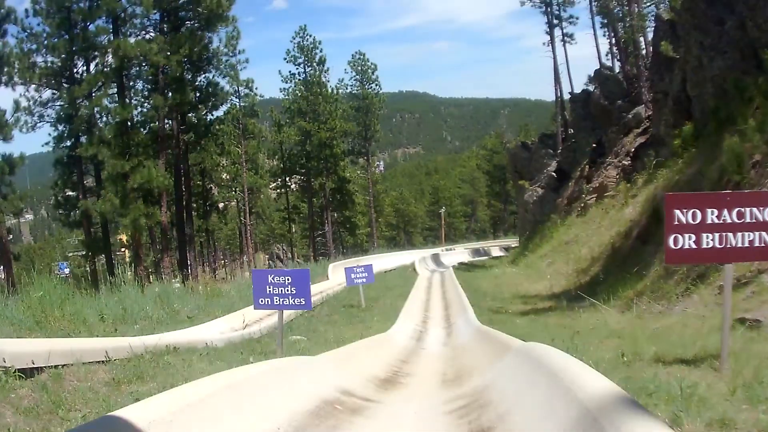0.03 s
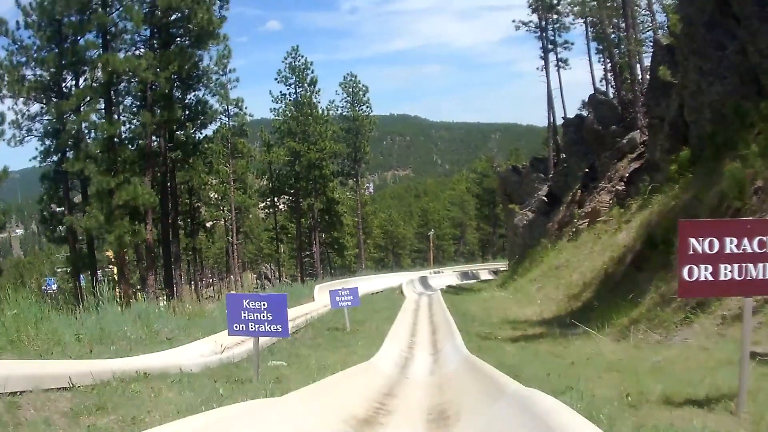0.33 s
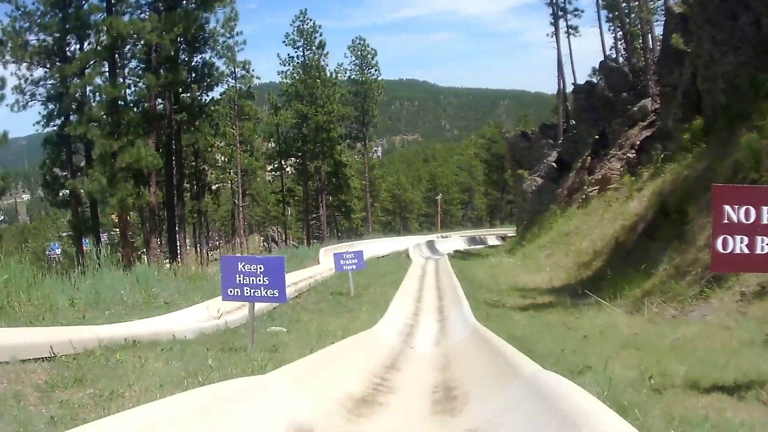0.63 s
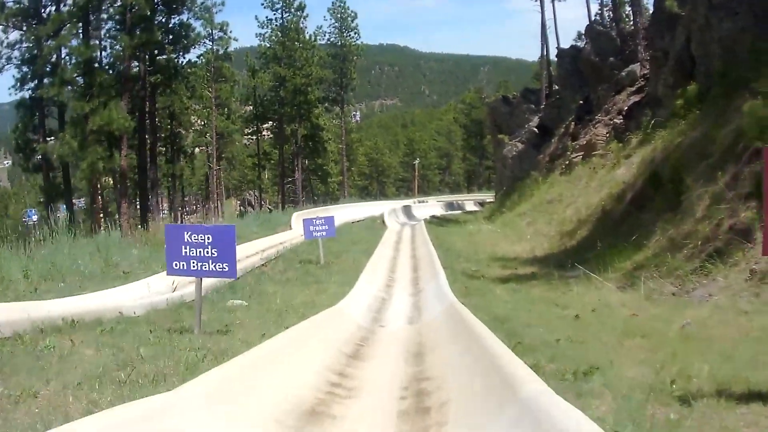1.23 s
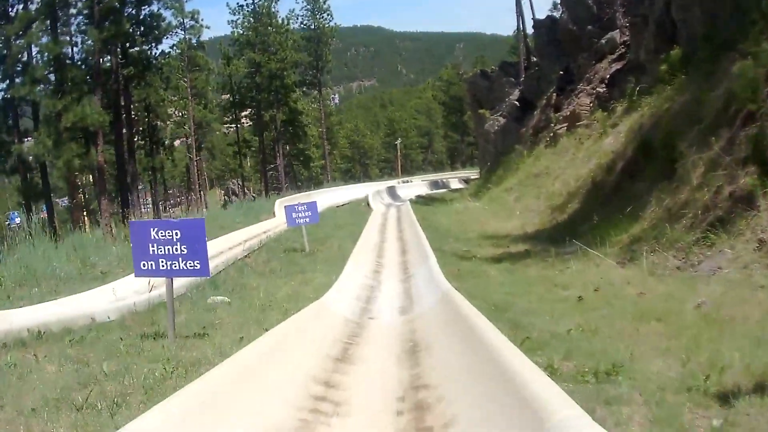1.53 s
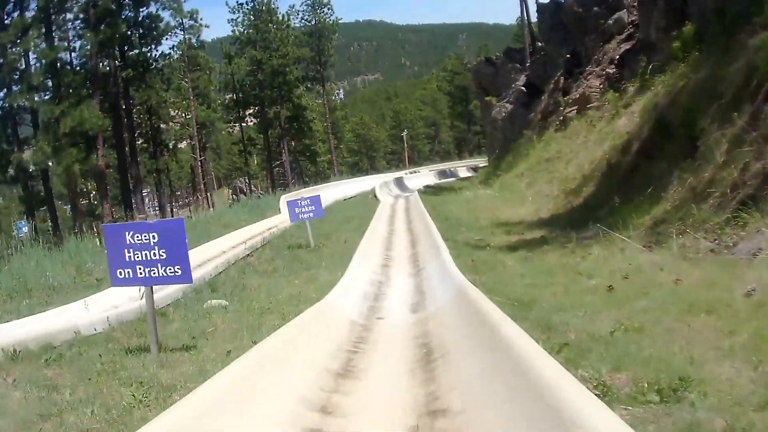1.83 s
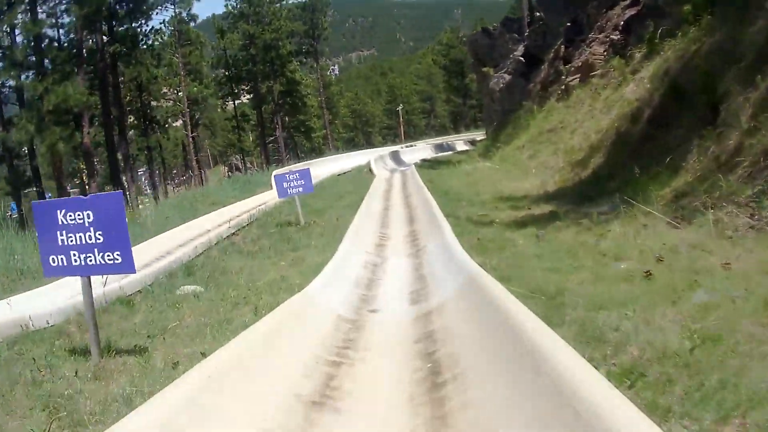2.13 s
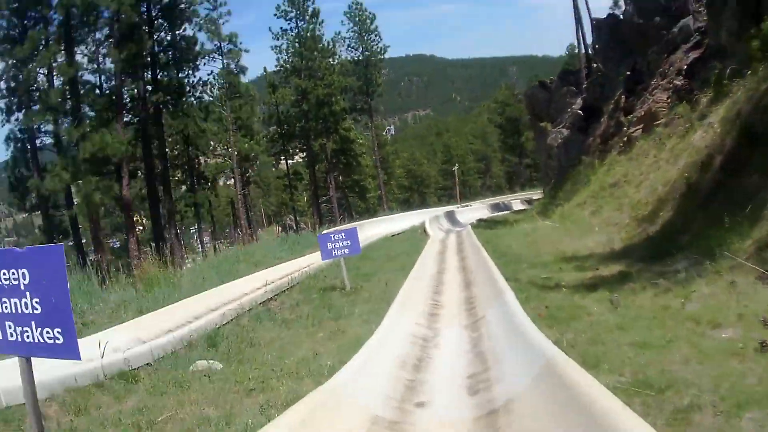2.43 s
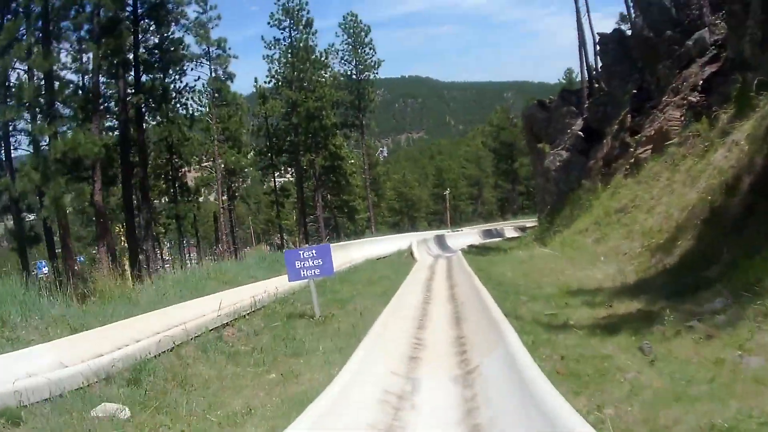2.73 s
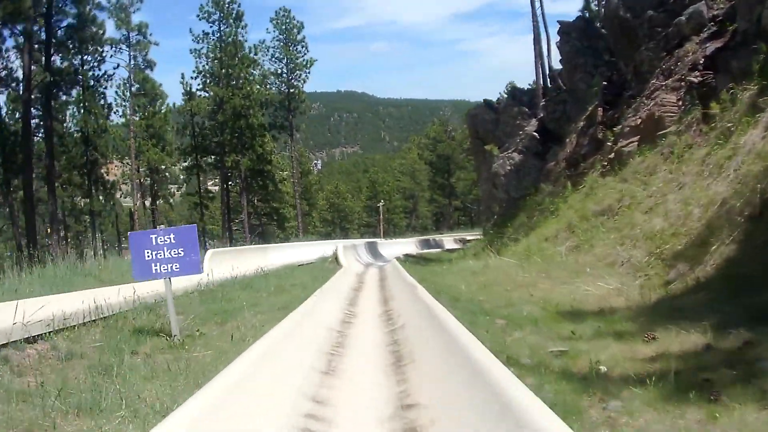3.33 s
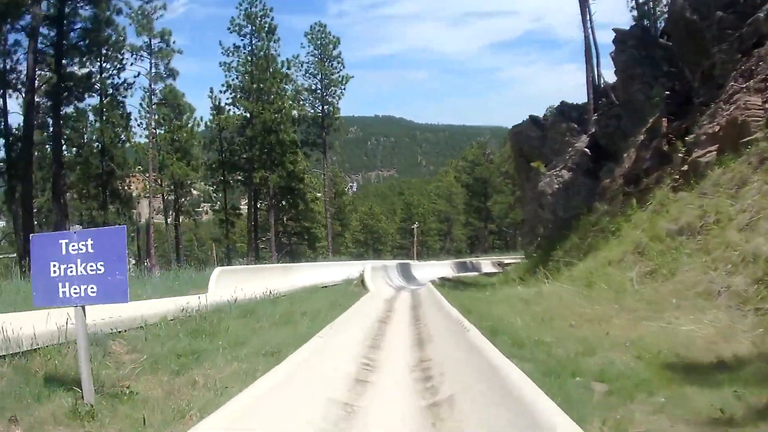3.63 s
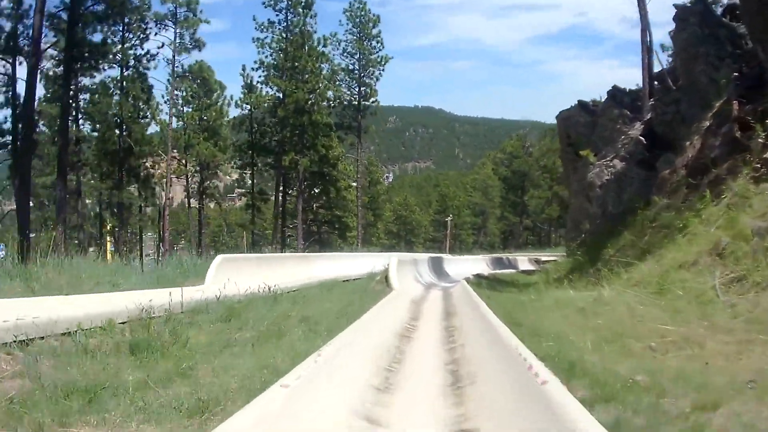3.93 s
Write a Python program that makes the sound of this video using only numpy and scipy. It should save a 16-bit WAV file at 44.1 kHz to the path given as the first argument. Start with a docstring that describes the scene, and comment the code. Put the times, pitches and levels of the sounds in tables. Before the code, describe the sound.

A wheeled sled rolls down a slide track, heard from the seat, starting with a quiet rumble, grainy hiss and light knocks. A brief scrape comes at about 1.4 seconds, then a hollow, wavering drone. Near 2.3 seconds wind puffs on the microphone and a cluster of bumps hits. The rumble swells with speed until 4 seconds, with the hardest, slightly distorted knocks around 3.2 and from 3.7 seconds.

```python
"""A wheeled sled gathers speed down a trough-shaped slide, heard from the rider's seat.
The wheels rumble through the plastic shell and drone in the trough; bumps in the track knock the sled.
The runners hiss, squeak once and scrape. Wind puffs on the microphone,
and the hardest knocks overload the camera."""
import sys
import numpy as np
from scipy import signal
from scipy.fft import rfft, irfft, next_fast_len
from scipy.io import wavfile
from scipy.ndimage import uniform_filter1d, map_coordinates

SR = 44100
rng = np.random.default_rng(int(sys.argv[2]) if len(sys.argv) > 2 else 0)


def pcm_store(signal):
    """Save signal as 16-bit PCM."""
    levels = np.round(np.clip(np.atleast_2d(signal), -1, 1) * 32767)
    wavfile.write(sys.argv[1], SR, levels.astype(np.int16).T)


N = 176400


def amp(db):
    """Decibels to gain."""
    return 10 ** (np.asarray(db) / 20)


def unit(x):
    """Scaled to rms 1."""
    return x / np.sqrt(np.mean(x ** 2) + 1e-20)


def curve(rows):
    """An automation lane: one value per sample from (time_s, value) rows."""
    return np.interp(np.arange(N) / SR, *np.transpose(rows))


def wobble(rate_hz):
    """A smooth random modulator, rate_hz knots a second."""
    knots = rng.standard_normal(int(N * rate_hz / SR) + 4)
    return map_coordinates(knots, [np.arange(N) * rate_hz / SR])


def colour(points, hz):
    """EQ gain through (freq_hz, gain_db) points on a log axis."""
    freq_hz, gain_db = np.transpose(points)
    return amp(np.interp(np.log(hz + 1), np.log(freq_hz + 1), gain_db))


def resonant(modes, hz, order=1):
    """Gain of a bank of resonances; a higher order has steeper skirts."""
    return np.sqrt(sum(amp(db) ** 2 / (1 + (2 * (hz - centre) / width) ** 2) ** order
                       for centre, width, db in modes))


def filtered(x, gain):
    """x through a minimum-phase filter whose gain is a function of frequency."""
    size = 2 * next_fast_len(len(x))
    hz = np.fft.rfftfreq(size, 1 / SR)
    cepstrum = irfft(np.log(np.maximum(gain(hz), 1e-6)))
    cepstrum[1:size // 2] *= 2
    cepstrum[size // 2 + 1:] = 0
    return irfft(rfft(x, size) * np.exp(rfft(cepstrum)))[:len(x)]


def noise(points):
    """Coloured noise of rms 1."""
    return unit(filtered(rng.standard_normal(N), lambda hz: colour(points, hz)))


def patchy(x, depth_db):
    """x with brief random patches of gain, each a few hundred hertz wide, at rms 1."""
    spectra = signal.stft(x, nperseg=1024)[2]
    patches = uniform_filter1d(rng.standard_normal(spectra.shape), size=7, axis=0)
    patches = unit(uniform_filter1d(patches, size=6, axis=1))
    return unit(signal.istft(spectra * amp(depth_db * patches), nperseg=1024)[1][:N])


# Sub-bass of the wind: freq_hz, gain_db
WIND_EQ = [(8, 4.5), (20, 6.5), (45, -4.5), (75, -11), (150, -45)]
# Wind fader: time_s, level_db
WIND_LEVEL = [(0, -41.5), (1.2, -47.5), (2.2, -44.5), (2.29, -28.5), (2.42, -35.5), (4, -62.5)]

def wind():
    """Low, lumpy puffs of air on the microphone."""
    puffs = noise(WIND_EQ) * amp(2.3 * np.tanh(wobble(18)))
    return unit(puffs) * amp(curve(WIND_LEVEL))


# Tone of the runners' hiss: freq_hz, gain_db
HISS_EQ = [(300, -14.5), (1500, 8.5), (2500, -1.5), (3200, -0.5), (4400, -2), (5600, -1), (7000, -3.5),
           (9300, -4.5)]
# Hiss fader: time_s, level_db
HISS_LEVEL = [(0, -47), (.27, -46), (.44, -40), (1.03, -40), (1.28, -42), (1.42, -38), (1.76, -43),
              (2, -37), (2.24, -39), (2.67, -37), (2.83, -33), (3.11, -35.5), (3.32, -30.5), (3.61, -28),
              (3.93, -34)]

def runners():
    """The runners slide with a grainy hiss whose colour keeps shifting."""
    hiss = patchy(noise(HISS_EQ), depth_db=2.5)
    grain = amp(0.37 * wobble(40) + 1.07 * wobble(350))
    return unit(hiss * grain) * amp(curve(HISS_LEVEL))


def squeak(peak_s=1.161, pitch_hz=1405, fade_s=0.008):
    """A runner gives one tiny, rough-edged squeak."""
    t = np.arange(N) / SR
    envelope = 2 * amp(-34) * np.exp(-np.abs(t - peak_s) / fade_s)
    return envelope * np.sin(2 * np.pi * pitch_hz * t + 0.9 * wobble(220))


# Tone of the dragging runner: freq_hz, gain_db
SCRAPE_EQ = [(200, -26), (650, -24), (950, -0.5), (1450, -15), (1900, -3), (2600, -2.5), (3200, -19.5),
             (5500, -11), (9000, -34)]
# Its ringing resonances: pitch_hz, width_hz, gain_db
SCRAPE_MODES = [(1003, 93, -4), (1260, 80, -4.5), (1454, 98, -0.5), (2320, 210, -19)]

def scrape(start_s=1.424, hold_s=0.092, release_t60_s=0.39, level_db=-34, ring_db=10):
    """A runner catches the trough and rings as it drags."""
    since = np.arange(N) / SR - start_s
    stroke = (since > 0) * amp(level_db - 60 * np.maximum(since - hold_s, 0) / release_t60_s)
    slips = rng.standard_normal(N) * amp(0.82 * wobble(200))
    tone = lambda hz: colour(SCRAPE_EQ, hz) + amp(ring_db) * resonant(SCRAPE_MODES, hz, order=2)
    return stroke * unit(filtered(slips, tone))


# Hollow resonances of the wheels in the trough: pitch_hz, width_hz, gain_db
DRONE_MODES = [(608.4, 61, 6), (647, 82, -2), (751, 85, -2)]
# Drone fader, highest midway: time_s, level_db
DRONE_LEVEL = [(0, -49), (1.5, -51), (1.65, -41.5), (1.95, -38.5), (2.11, -45), (2.19, -33.5),
               (2.55, -34.5), (4, -55)]

def drone(waver_hz=12):
    """The wheels sound a hollow, surging and wavering note in the trough."""
    ring = filtered(rng.standard_normal(N), lambda hz: resonant(DRONE_MODES, hz, order=2))
    drift_cycles = np.cumsum(waver_hz * wobble(12)) / SR
    wavering = np.real(signal.hilbert(ring) * np.exp(2j * np.pi * drift_cycles))  # frequency shifter
    surging = wavering * amp(3.1 * wobble(29.96))
    return patchy(surging, depth_db=2.0) * amp(curve(DRONE_LEVEL))


# Bright resonances of the wheel frame: pitch_hz, width_hz, gain_db
FRAME_MODES = [(1750, 140, 13), (3750, 600, 9), (4520, 84, 9), (5330, 840, 8)]

def frame(hz):
    """Gain of the wheel frame, which rings in hard contacts."""
    return np.hypot(resonant(FRAME_MODES, hz), 1)


# Body resonances of the plastic shell: pitch_hz, width_hz, gain_db
SHELL_MODES = [(273.5, 12.6, 7), (370, 33, -4), (450, 103, -4), (669, 106, 1), (774, 38, 3), (825, 61, 2.5),
               (975, 78, -2), (1089, 107, 2), (1253, 180, -0.5), (1443, 60, 0.5), (1700, 210, -11),
               (2280, 240, -3)]

def shell(hz, direct_db=-7):
    """Gain of the sled's shell: its resonances plus what passes between them."""
    return np.hypot(resonant(SHELL_MODES, hz), amp(direct_db))


def burst(t, gain, t60_s, attack_s=0.00066, tail_db=-30, tail_t60_s=0.41):
    """An impact and its quickly dying clatter through a filter, starting near rms 1."""
    decay = amp(-60 * t / t60_s) + amp(tail_db - 60 * t / tail_t60_s)
    envelope = decay * (1 - np.exp(-t / attack_s))
    clatter = envelope * rng.standard_normal(len(t))
    click = 0.058 * np.linalg.norm(envelope) * (t == 0)
    return unit(filtered(clatter + click, gain)) * np.sqrt(np.mean(envelope ** 2))


# Midrange knock of the shell: freq_hz, gain_db
KNOCK_EQ = [(60, -5), (250, -12), (600, 1), (1000, 0), (1500, 0.5), (2200, -10), (3200, -24), (5000, -22.5),
            (9000, -34)]
# Top-end crack of the wheel frame: freq_hz, gain_db
CRACK_EQ = [(300, -41), (1200, -20), (2000, 7.5), (3700, -8), (5500, -6.5), (9500, 1.5)]
# Low thud of the chassis: freq_hz, gain_db
THUD_EQ = [(30, -11), (115, 0.5), (170, -4), (260, 0), (370, -0.5), (800, -28)]
# Bumps in the track, crack and thud relative to the knock: start_s, level_db, crack_db, thud_db, ring_hz
BUMP_HITS = [(.053, -31.5, -22, -11.5, 1110), (0.084, -35, -20, -8, 1500), (0.224, -36, -27, 4.5, 400),
             (.258, -31, -9, -7, 450), (0.4627, -18, -3, -11, 1830), (.783, -32.5, -19, -6, 790),
             (.8195, -27, -10, -10, 920), (.8985, -27.5, -18, -14, 1060), (1.051, -30.5, -22, -9, 625),
             (1.286, -30, -22, -14, 790), (1.424, -23.5, -14, -25, 1240), (1.623, -28.5, -10, -18, 650),
             (2.172, -26, -30, -19, 716), (2.193, -29, -29, -19, 616), (2.236, -24.5, -27, -30.5, 740),
             (2.359, -5.5, -9.5, -14, 1240), (2.377, -17, -11.5, -4, 870), (2.4478, -10, 0.5, -13, 1610),
             (2.453, -19, -1.5, 6.5, 1190), (2.465, -15.5, -2.5, -12, 1720), (2.642, -15, -25, -5, 650),
             (2.712, -18, -19, -15, 860), (2.888, -12.5, -26, -27, 790), (3.118, -14.5, -18, -16.5, 1170),
             (3.2224, 2, -12, -18, 1200), (3.305, -17, -28.5, 0, 350), (3.42, -25, -35, 6.5, 396),
             (3.7163, 0, -6, -13, 924), (3.786, -9.5, -2.5, 3, 1410), (3.793, -3.5, -30, -17, 880),
             (3.8615, -3.5, -27, -16, 1110), (3.8965, -11, -32, -12.5, 750), (3.972, -9, -14, -24.5, 930)]

def bumps(full_cutoff_hz=8100, db_per_octave=15.5, ring_db=3):
    """Each bump knocks the shell at its own spot, cracks in the wheel frame and thuds in the chassis."""
    out = np.zeros(N + SR)
    t = np.arange(SR // 4) / SR
    for start_s, level_db, crack_db, thud_db, ring_hz in BUMP_HITS:
        cutoff_hz = full_cutoff_hz * 2 ** (level_db / db_per_octave)  # softer hits crack duller
        lowpass = lambda hz: 1 / np.sqrt(1 + (hz / cutoff_hz) ** 8)
        spot = lambda hz: 0.5 + resonant([(ring_hz, 0.57 * ring_hz, ring_db)], hz, order=2)
        knock = burst(t, lambda hz: colour(KNOCK_EQ, hz) * shell(hz) * spot(hz), t60_s=0.043)
        crack = burst(t, lambda hz: colour(CRACK_EQ, hz) * frame(hz) * lowpass(hz), t60_s=0.052)
        thud = burst(t, lambda hz: colour(THUD_EQ, hz), t60_s=0.062)
        hit = knock + amp(crack_db) * crack + amp(thud_db) * thud
        out[round(start_s * SR):][:len(t)] += amp(level_db) * hit
    return out[:N]


# Tone of the wheels ahead of the shell: freq_hz, gain_db
WHEEL_EQ = [(60, -4), (200, -19.5), (420, -1.5), (540, -7), (680, -6), (1400, -4), (1750, -3.5),
            (2000, -12.5), (2800, -19.5), (4500, -25), (9000, -43)]
# Wheel fader, building with speed: time_s, level_db
WHEEL_LEVEL = [(0, -46), (.7, -49), (1.35, -46.5), (1.75, -39.5), (2.3, -33), (2.58, -26.5), (2.82, -23),
               (3.25, -21.5), (4, -19.5)]
# Low rumble of the chassis: freq_hz, gain_db
CHASSIS_EQ = [(25, -2), (60, -7.5), (105, -2.5), (165, 0), (230, 2.5), (350, -3.5), (550, -15), (1500, -33)]
# Chassis fader: time_s, level_db
CHASSIS_LEVEL = [(0.0, -48.5), (1.53, -47), (4.0, -24.5)]

def rolling(grit_per_s=260, grit_spread_db=8.5, grit_db=-6.5, wheel_trim_db=1, chassis_trim_db=-2.5):
    """Track roughness and grit shake the shell through the wheels; the chassis rumbles below."""
    jolt_db = 1.25 * wobble(48)  # moves wheels and chassis together
    ticks = (rng.random(N) < grit_per_s / SR) * rng.choice([-1, 1], N)
    grit = ticks * amp(grit_spread_db * np.minimum(rng.standard_normal(N), 2))
    roughness = rng.standard_normal(N) * amp(1.3 * wobble(130))
    force = roughness + amp(grit_db) * unit(grit)
    body = filtered(force, lambda hz: colour(WHEEL_EQ, hz) * shell(hz))
    wheels = patchy(body, depth_db=0.46) * amp(jolt_db)
    chassis = noise(CHASSIS_EQ) * amp(0.5 * jolt_db + 3.96 * wobble(21.44))
    return (wheels * amp(curve(WHEEL_LEVEL) + wheel_trim_db)
            + chassis * amp(curve(CHASSIS_LEVEL) + chassis_trim_db))


def scene():
    """Sled and wind, mixed in mono."""
    return (rolling() + drone() + runners() + squeak() + scrape() + bumps() + wind())[None]


def record(dry):
    """The camera has a narrow band with a notch in the treble, and flattens the loudest peaks."""
    notch_hz, notch_width_hz, notch_db = 7928, 348, -39
    band_hz, top_hz, overtone_db = 9650, 15800, -6.5
    ceiling, hardness = 0.72, 9
    hz = np.fft.rfftfreq(2 * N, 1 / SR)
    notch = amp(notch_db * np.exp(-((hz - notch_hz) / notch_width_hz) ** 2))
    narrow = irfft(rfft(dry, 2 * N) * notch * (hz < band_hz))[:, :N]
    driven = narrow / (1 + np.abs(narrow / ceiling) ** hardness) ** (1 / hardness)
    shelf = amp(overtone_db * (hz > band_hz)) * (hz < top_hz)  # tames the overload's highest overtones
    return irfft(rfft(driven, 2 * N) * shelf)[:, :N]


dry = scene()
out = record(dry)
pcm_store(out)
```